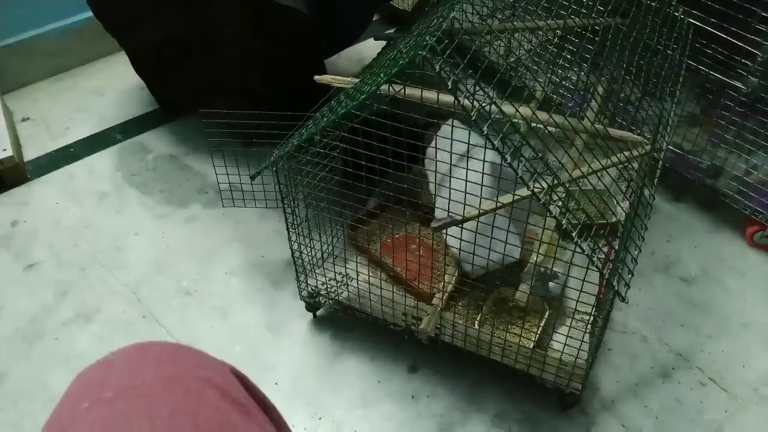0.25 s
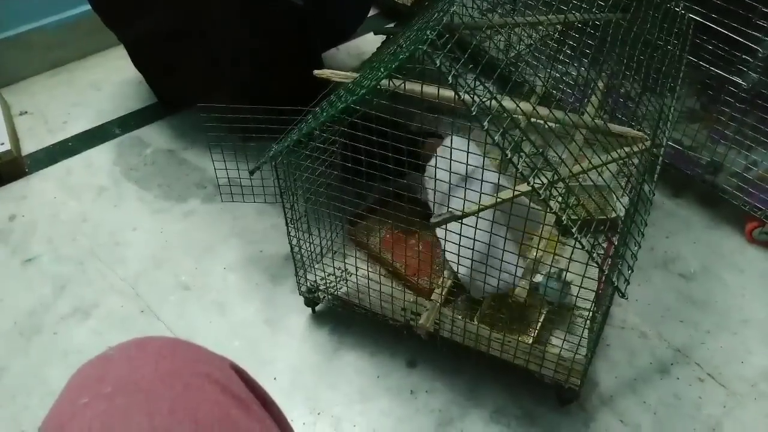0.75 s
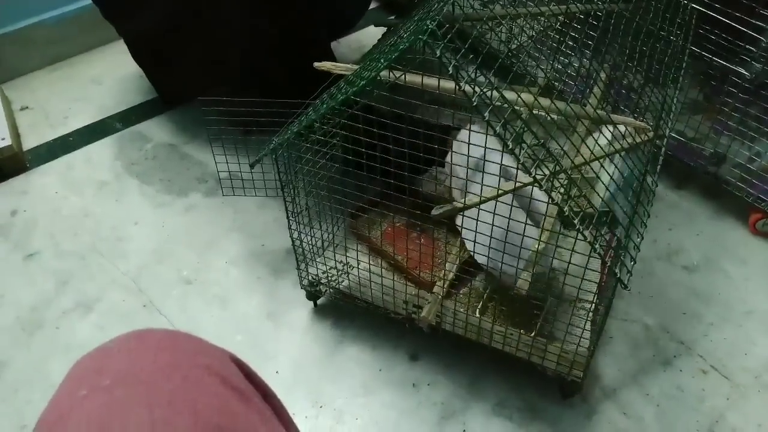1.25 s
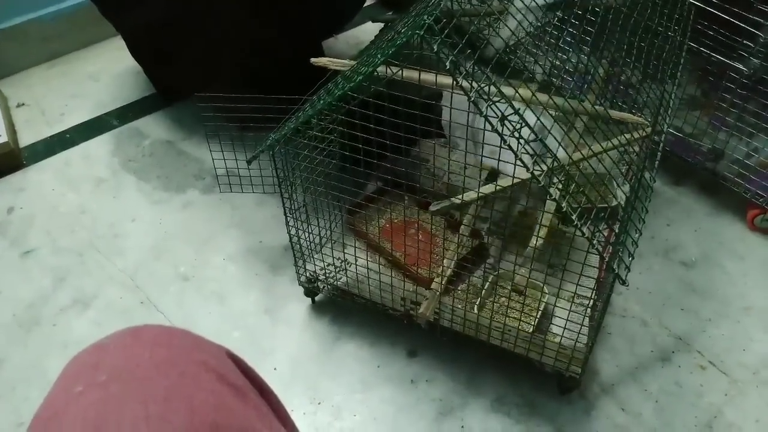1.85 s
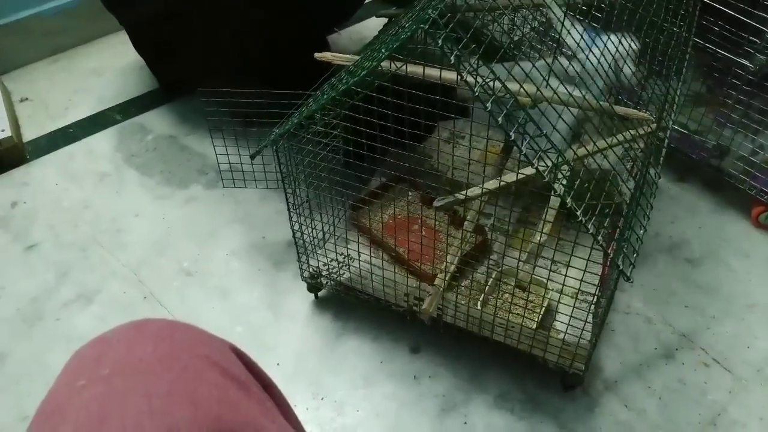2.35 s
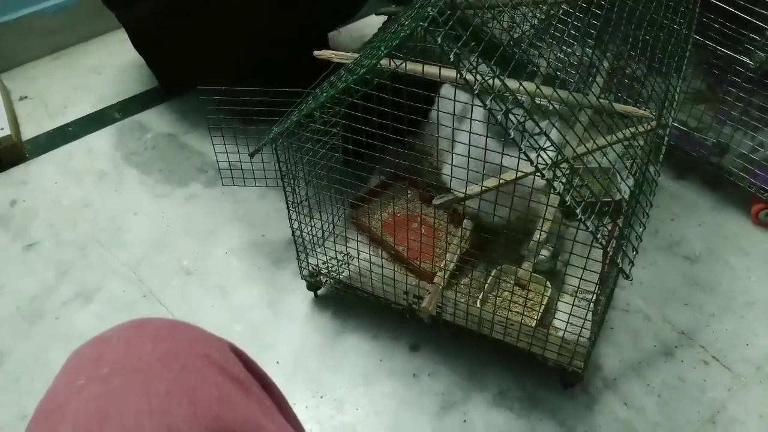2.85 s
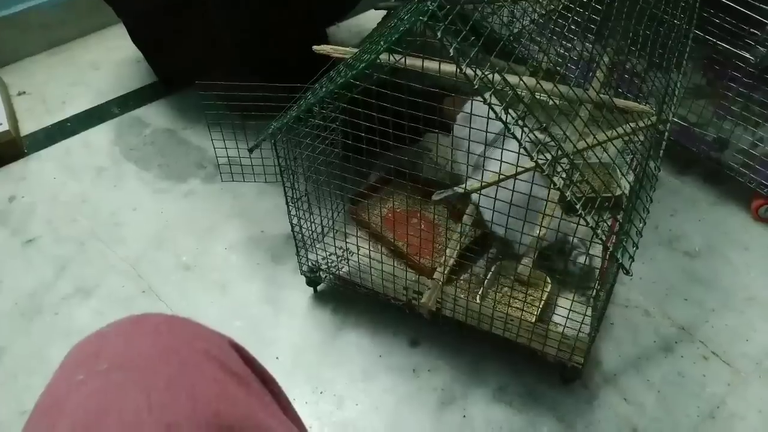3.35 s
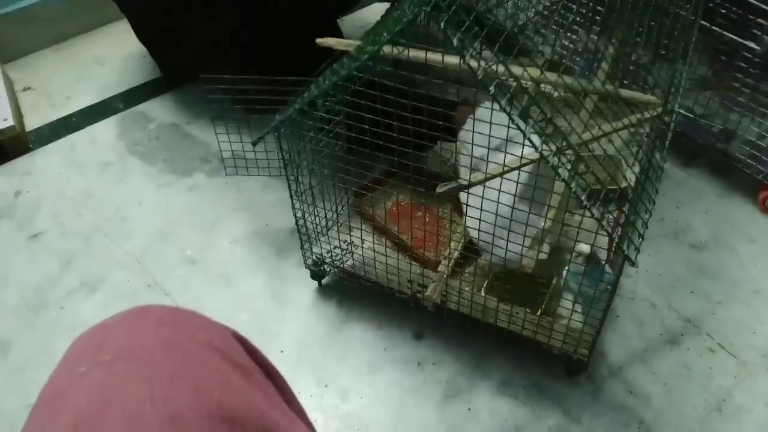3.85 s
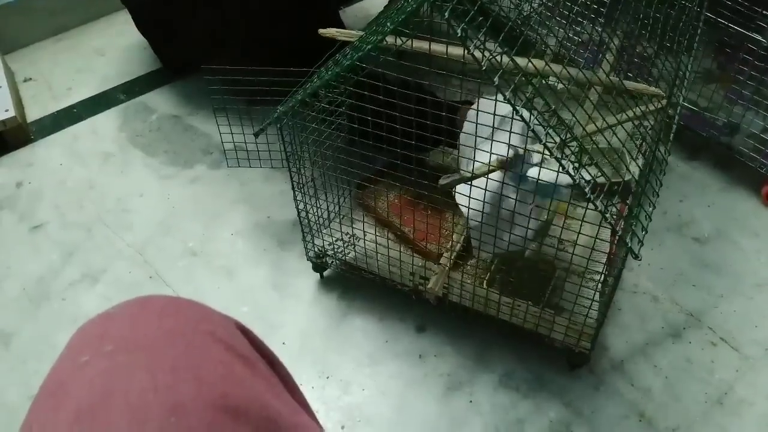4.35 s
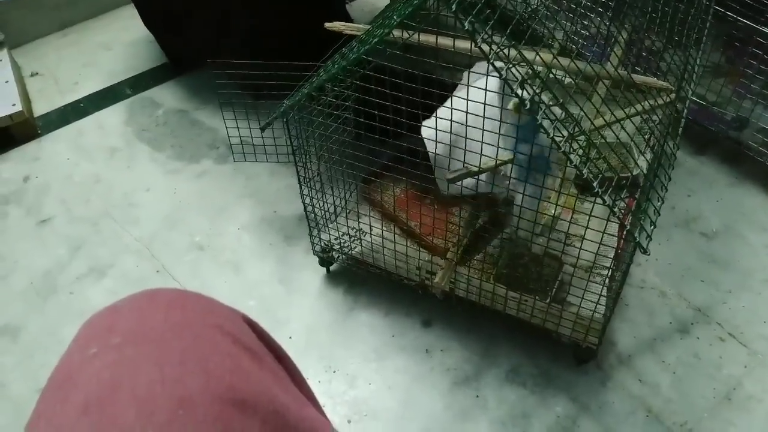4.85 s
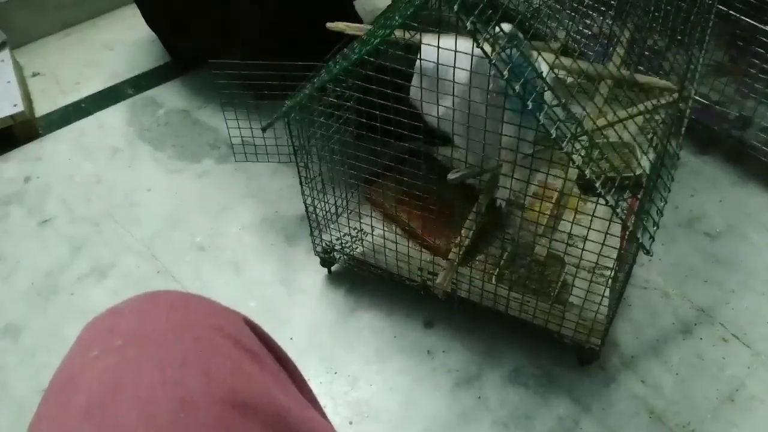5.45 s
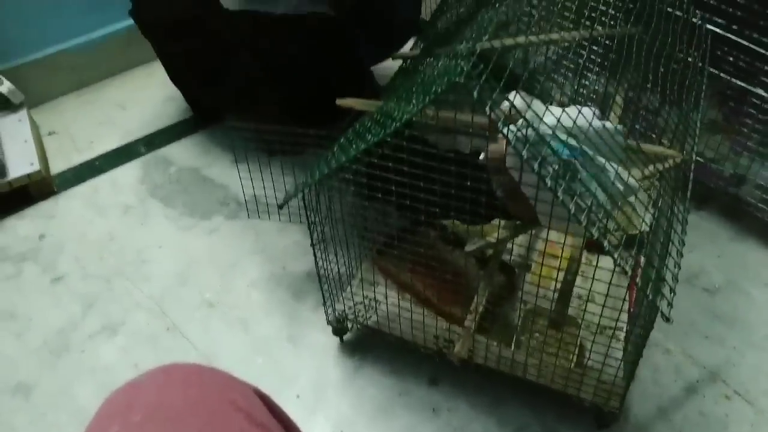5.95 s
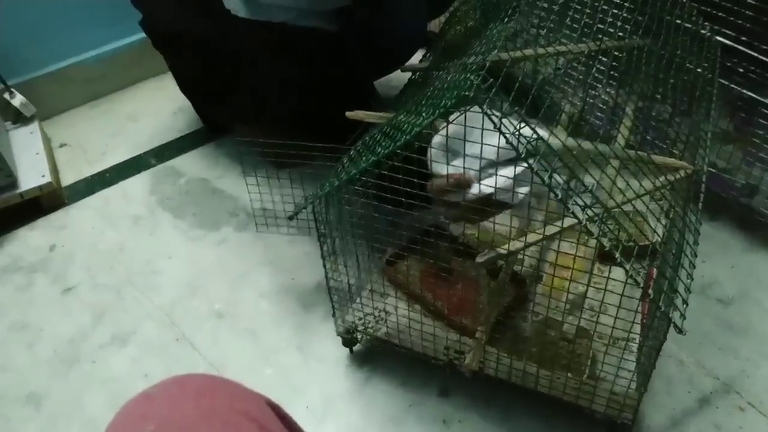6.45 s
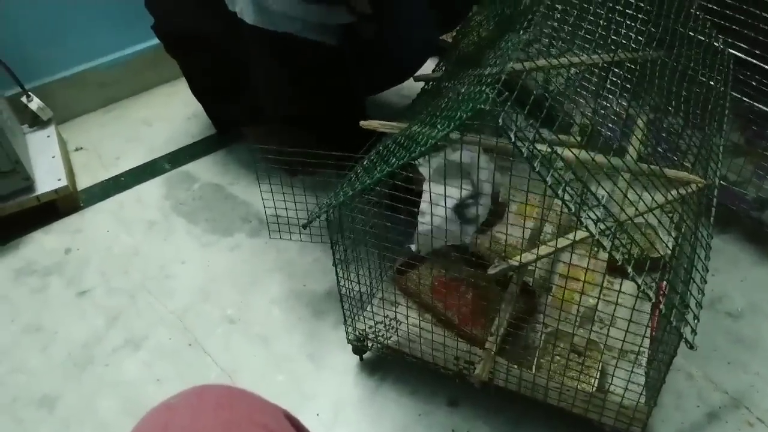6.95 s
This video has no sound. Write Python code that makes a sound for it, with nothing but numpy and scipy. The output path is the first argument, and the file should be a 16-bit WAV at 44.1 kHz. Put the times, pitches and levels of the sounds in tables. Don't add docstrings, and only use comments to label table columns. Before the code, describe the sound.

Small caged birds flutter in bursts, wings hissing and claws ticking on wire, with a parakeet's screeches and warbles and buzzy finch calls in a tiled room.

```python
import sys
import numpy as np
from scipy import signal
from scipy.fft import rfft, irfft, next_fast_len
from scipy.io import wavfile
from scipy.ndimage import uniform_filter1d, minimum_filter1d

SR = 44100
rng = np.random.default_rng(int(sys.argv[2]) if len(sys.argv) > 2 else 0)


def inscribe(sig):
    pcm = np.round(np.clip(np.atleast_2d(sig).T, -1, 1) * 32767)
    wavfile.write(sys.argv[1], SR, pcm.astype(np.int16))


def gain_from_decibels(decibels):
    exponent = np.asarray(decibels, float) / 20
    return 10 ** exponent


N = 317079
PORT_LAG_S = 0.0001756


def rms_one(x):
    return x / np.sqrt(np.mean(x ** 2) + 1e-20)


def at_hz(points, hz):
    table_hz, value = np.transpose(points)
    return np.interp(np.log(np.maximum(hz, 1)), np.log(table_hz), value)


def add(track, s, sound):
    i = round(s * SR)
    track[i:i + len(sound)] += sound[:N - i]


def drift(rate_hz, size):
    pole = np.exp(-3 * np.pi * rate_hz / SR)
    white = rng.standard_normal(size + 500)
    return rms_one(signal.lfilter([1], np.poly([pole] * 3), white)[500:])


def patches(shape, band_size, frame_size):
    coarse = rng.standard_normal((shape[0] // band_size + 1, shape[1] + frame_size))
    smooth = uniform_filter1d(coarse, frame_size, axis=1) * np.sqrt(frame_size)
    return np.repeat(smooth, band_size, axis=0)[:shape[0], :shape[1]]


def coloured(spectrum, grain_db=0, patchy_db=0, size=8):
    raw = rng.standard_normal(N)
    if patchy_db:
        frames = signal.stft(raw, nperseg=1024)[2]
        patch_gain = gain_from_decibels(patchy_db * patches(frames.shape, band_size=size, frame_size=2))
        raw = signal.istft(frames * patch_gain)[1][:N]
    if grain_db:
        raw = raw * gain_from_decibels(grain_db * drift(404, size=N))
    padded = next_fast_len(N)
    hz = np.fft.rfftfreq(padded, 1 / SR)
    inside = (hz >= spectrum[0][0]) & (hz <= spectrum[-1][0])
    return rms_one(irfft(rfft(raw, padded) * gain_from_decibels(at_hz(spectrum, hz)) * inside)[:N])


# (time [s], peak [dB], body [dB], fall [s])
FLAPS = [(0.0855, -18.5, -14.5, 0.01555), (0.194, -32.5, -7.5, 0.0328), (0.39, -38, -4, 0.0036),
         (0.438, -47.5, -14, 0.042), (0.582, -39.5, -27, 0.0071), (0.922, -26.5, -21, 0.017),
         (1.215, -37.5, -7, 0.027), (1.362, -25, -45.5, 0.017), (1.415, -23.5, -15, 0.0096),
         (1.4504, -13.5, -7, 0.0093), (1.5531, -15, -8, 0.0089), (1.6726, -19, -41.5, 0.0081),
         (2.07, -32.5, -15, 0.02), (2.366, -31, -11, 0.0451), (2.577, -26.5, -11, 0.0063),
         (2.8988, -36.5, -5, 0.038), (3.212, -33.5, -4.5, 0.0176), (3.4245, -26, -18, 0.00565),
         (3.499, -33, -14.5, 0.0055), (3.58, -32.5, -8, 0.018), (4.054, -25, -18, 0.00916),
         (4.2179, -28, -8.5, 0.0063), (4.344, -36, -10, 0.016), (4.95, -49, -33, 0.018),
         (5.0502, -45.5, -12, 0.0169), (5.437, -44, -27.5, 0.0033), (6.074, -39, -5.5, 0.01297),
         (1.9, -43.5, -13, 0.056), (2.63, -30.5, -10, 0.015), (2.72, -31, -4, 0.008),
         (2.78, -39.5, 2.5, 0.0098), (2.82, -33.5, 1, 0.027), (4.14, -30.5, -8, 0.0067),
         (4.181, -37.5, -24, 0.016), (6.37, -49, -15.5, 0.022), (6.845, -32.5, -11.5, 0.0124),
         (0.95, -35, -22, 0.01), (4.09, -38, -3.5, 0.0176), (4.55, -50.5, -11.5, 0.015)]
# (time [s], peak [dB], quill rasp [dB], body [dB], fall [s])
RAKES = [(0.829, -48, 20.5, 5, 0.0224), (0.8865, -37, 11.5, -5, 0.0197), (2.2427, -41, 19, -7.5, 0.033),
         (2.688, -25, 3, -1.5, 0.0093), (2.744, -22, 5.5, -6, 0.014), (3.05, -44, 25, 14, 0.00757),
         (3.3253, -41.5, 12.5, 5.5, 0.0084), (3.792, -37.5, 5, -4, 0.016), (3.932, -38, 8, -18.5, 0.0143),
         (5.274, -48, 16.5, -4.5, 0.0494), (5.5852, -32.5, 7.5, -3.5, 0.0117),
         (5.6565, -21.5, 9, -3, 0.0607), (5.739, -16, -1.5, -1.5, 0.0168)]
# (height [s], build-up [s], rustle [dB], thump [dB], draught on the ports [dB])
BOUTS = [(0.0, .1, -30, -59, -59.5), (.36, 0.34, -53.5, -77, -72.5), (.98, 0.39, -85, -54, -66.5),
         (1.3, 0.137, -46.5, -71, -75), (1.56, 0.239, -32.5, -37, -33), (1.68, 0.31, -54.5, -58, -43.5),
         (2.3, 0.32, -53.5, -69.5, -75), (2.457, 0.171, -75, -47, -52),
         (2.699, 0.1785, -33.5, -50.5, -47.5), (3.1, 0.74, -51.5, -64.5, -72), (3.5, 1.47, -54, -63.5, -69),
         (3.68, 0.58, -65.5, -52.5, -54.5), (3.98, 0.98, -51, -60, -75), (4.102, 0.25, -43, -48.5, -53.5),
         (4.2, 0.212, -52, -48.5, -69), (5.552, 2.05, -88.5, -77.5, -65.5), (5.708, 0.1473, -34, -35, -82),
         (5.789, 0.149, -57, -36.5, -38.5), (7.09, 0.66, -72, -59, -73.5), (7.19, 0.21, -48, -50, -79)]
# (rustle, thump, draught) [dB], [dB/s]
REST_DB = [-100, -70, -65]
CALM_DB_PER_S = [76.5, 101.5, 132]
# (frequency [Hz], level [dB/Hz])
FEATHER = [(2710, -33), (4600, -7), (7910, 1.5), (10100, 2), (12900, -2.5), (14900, 0), (16000, -13)]
QUILL = [(760, -8.5), (1300, -9.5), (1730, -4.5), (4210, -4.5), (4800, -11.5), (6240, -41), (10600, -120)]
BODY = [(280, -37.5), (470, -21), (529, -12), (1400, -12.5), (1820, -37.5), (3080, -120)]
THUMP = [(82, -40.5), (140, -16.5), (184, -7), (220, -4), (330, -6), (365, -14.5), (426, -9), (500, -21),
         (650, -47.5), (1100, -120)]
DRAUGHT = [(15, -60.5), (25, -30), (68, -3), (113, 0.5), (150, -6.5), (200, -36.5), (330, -120)]


def stirring():
    build_db = 31
    now = np.arange(N) / SR
    stir_db = np.array(REST_DB)[:, None] * np.ones(N)
    for at, build_s, *height_db in BOUTS:
        climb = build_db * np.maximum(at - now, 0) / max(build_s, .02)
        calm = np.outer(CALM_DB_PER_S, np.maximum(now - at, 0))
        stir_db = np.maximum(stir_db, np.array(height_db)[:, None] - climb - calm)
    return gain_from_decibels(2 * stir_db)


def wings():
    hiss, thump, draught = stirring()
    rasp = hiss * gain_from_decibels(2 * -4.0)
    body = thump * gain_from_decibels(2 * -9.0)
    t = np.arange(SR // 3) / SR
    flap_rasp_db = 2
    strokes = RAKES + [(at, db, flap_rasp_db, body_db, fall) for at, db, body_db, fall in FLAPS]
    for at, db, rasp_db, body_db, fall in strokes:
        fall = max(fall, .004)
        swell = (1 - np.exp(-t / (1.1 * fall))) ** 2 * np.exp(-t / fall)
        power = (swell / swell.max()) ** 2
        add(hiss, at, power * gain_from_decibels(2 * (db - 7.0)))
        add(rasp, at, power * gain_from_decibels(2 * (db + rasp_db - 15.5)))
        add(body, at, power * gain_from_decibels(2 * (db + body_db - 11.0)))
    feathers = []
    for port in (0, 1):
        soft = np.sqrt(hiss) * coloured(FEATHER, grain_db=-0.5, patchy_db=4.0, size=16)
        harsh = np.sqrt(rasp) * coloured(QUILL, grain_db=5.0, patchy_db=6.5, size=6)
        feathers.append(soft + harsh)
    low = np.sqrt(body) * coloured(BODY, grain_db=2.5, patchy_db=1.5, size=3)
    low += np.sqrt(thump) * coloured(THUMP, patchy_db=2.5, size=2)
    opposed = 0.244 * coloured(DRAUGHT) * np.array([[1], [-1]])
    buffet = np.sqrt(draught) * (coloured(DRAUGHT, patchy_db=5.0, size=2) + opposed)
    return feathers[0] + low, 0.042 * feathers[0] + 0.729 * feathers[1] + low, buffet


# (time [s], peak [dB], main ring [Hz], t60 [s])
TICKS = [(0.437, -32, 8790, 0.0214), (0.835, -31, 2150, 0.021), (2.581, -34.5, 2600, 0.0118),
         (4.149, -25.5, 2240, 0.0152), (4.227, -25, 2010, 0.0143), (4.37, -30, 5100, 0.0107),
         (0.8888, -16.5, 2932, 0.0147), (1.455, -13.5, 3140, 0.0335), (1.5592, -24, 2580, 0.0117),
         (1.6832, -4.5, 2393, 0.00485), (2.14, -27, 1454, 0.017), (2.579, -30.5, 7620, 0.015),
         (2.6913, -13, 8260, 0.0101), (2.7518, -12.5, 2910, 0.0098), (2.9, -22, 9790, 0.0276),
         (3.0602, -19.5, 4014, 0.011), (4.0648, -28.5, 4970, 0.0265), (4.102, -36, 4150, 0.0069),
         (5.091, -45, 862, 0.0123), (5.745, -5, 7750, 0.0219)]


def bars():
    others = 12
    out, t = np.zeros(N), np.arange(SR // 10) / SR
    for at, db, hz, t60 in TICKS:
        other_hz = np.exp(rng.uniform(np.log(1600), np.log(12000), others))
        wires_hz = np.append(hz, other_hz)[:, None]
        strength = gain_from_decibels(np.append(-4.0, rng.normal(-13, 3, others)))[:, None]
        ring = (strength * np.sin(2 * np.pi * wires_hz * t)).sum(0)
        ring *= gain_from_decibels(-60 * t / np.clip(t60, .003, .05))
        crack = 0.13 * np.diff(rng.standard_normal(len(t) + 1)) * np.exp(-t / 0.00083)
        add(out, at, gain_from_decibels(db - 3) * (ring + crack) * (1 - np.exp(-t / .001)))
    return out


def voice(rows, count, overtone_db, flutter_hz, waver, spread, fade_s, smear_rise=.55):
    s, hz, db, rough = np.transpose(rows)
    t = np.arange(s[0], s[-1], 1 / SR)
    hz, db, rough = (np.interp(t, s, column) for column in (hz, db, rough))
    rough = np.clip(rough, 0, 1)
    wavering_hz = hz * (1 + waver * rough * drift(flutter_hz, size=len(t)))
    phase = 2 * np.pi * np.cumsum(wavering_hz) / SR
    chop = drift(flutter_hz, size=len(t))
    tone, power = 0, 0
    for k in range(1, count + 1):
        gain = gain_from_decibels(overtone_db(k, hz)) * (k * hz < 15600)
        smear = drift(flutter_hz * k ** smear_rise, size=len(t))
        hoarse = rough ** (k ** -spread)
        breath = np.sqrt(1 - hoarse ** 2) + hoarse * (.7 * chop + .7 * smear)
        tone = tone + gain * breath * np.sin(k * phase + k * k)
        power = power + gain ** 2 / 2
    fade = np.clip(np.minimum(t - s[0], s[-1] - t) / fade_s, 0, 1)
    return s[0], fade * gain_from_decibels(db) * tone, np.sqrt(power)


def arch(size, swell):
    u, swell = np.linspace(0, 1, size), np.clip(swell, .05, .95)
    before = np.clip(1 - u / swell, 0, 1) ** 2
    after = np.clip((u - swell) / (1 - swell), 0, 1) ** 2
    return u, before, after


def note(s, length, first_hz, last_hz, db, swell):
    edge_db, rough = 6.5, 0.439
    u, before, after = arch(size=8, swell=swell)
    glide_hz = first_hz * (last_hz / first_hz) ** u
    return np.transpose([s + length * u, glide_hz, db - edge_db * (before + after), rough + 0 * u])


# (time [s], pitch [Hz], level [dB], roughness [0-1])
SCREECH = [
    [(0, 1938, -19, 0.7), (.02, 2019, -25, 0.6), (.032, 2290, -21.5, .7), (.045, 2391, -22, 0.4),
     (.065, 2468, -23.5, .7), (.088, 2443, -27, 0.88), (.11, 2300, -24, 1), (.125, 2100, -28.5, .9),
     (.145, 2008, -48.5, 1)],
    [(1.385, 2708, -18.5, 0.6), (1.4, 3075, -24.5, 0.6), (1.42, 3281, -15.5, 1.3), (1.445, 2967, -21, 0.8),
     (1.47, 3254, -13.5, 1.2), (1.5, 2921, -23, 1.13), (1.52, 2789, -27.5, 1.2), (1.55, 2550, -50.5, 1.1)],
    [(1.462, 2514, -28.5, 0.27), (1.474, 2490, -20.5, 0.8), (1.51, 2537, -26.5, 0.2),
     (1.535, 2358, -53, 1.1)],
    [(6.846, 1378, -49, 0.7), (6.87, 1512, -43, 0.9), (6.895, 1649, -29.5, 0.6), (6.92, 1831, -28, 0.35),
     (6.952, 1902, -27, 0.35), (6.98, 1782, -30, 0.35), (7.028, 1714, -29.5, 0.4), (7.085, 1865, -33, 0.3),
     (7.15, 1846, -49.5, 0.3)],
    [(6.665, 1250, -57.5, 1), (6.69, 1452, -53, 0.9), (6.72, 1296, -51, 1.1), (6.75, 1148, -50, 1.1),
     (6.785, 1190, -59.5, 0.9)],
]
SECOND_DB = [-5.5, 1, -3, 2.5, -19]
UPPER_DB = [-31, -35.5, -38, -17, -23]
BREATH_DB = [4, 4, 1, -4, 0]
# (rate [Hz], depth [0-1])
THROB = [(95, .4), (110, .25), (110, .2), (68, .35), (40, .6)]
# (time [s], length [s], first pitch [Hz], last pitch [Hz], level [dB])
WARBLE = [(1.13, 0.02, 4537, 3250, -49), (1.144, .018, 3254, 3050, -38), (1.156, .03, 2963, 1450, -34.5),
          (1.183, 0.042, 2861, 3271, -38), (1.221, .02, 3347, 3722, -40), (1.228, .016, 3056, 2075, -34),
          (1.243, 0.021, 1990, 2419, -35), (1.267, 0.044, 2494, 2064, -28.5),
          (1.296, .035, 2230, 1444, -29.5), (2.07, 0.04, 5000, 3084, -35.5),
          (2.097, 0.021, 3325, 1958, -31.5), (2.114, 0.023, 1972, 2440, -32.5),
          (2.145, 0.013, 2768, 3503, -31), (2.156, 0.044, 3580, 3422, -36),
          (2.163, 0.033, 2974, 1771, -32.5), (2.181, 0.024, 1870, 2040, -34.5),
          (2.219, .024, 2168, 2386, -28.5), (2.239, 0.027, 2318, 1633, -31.5),
          (2.242, 0.0081, 4066, 4520, -31), (6.232, 0.032, 5400, 3300, -41),
          (6.249, 0.022, 3346, 3098, -37.5), (6.26, .034, 2900, 1492, -33.5),
          (6.297, 0.032, 2961, 3300, -33.5), (6.325, 0.013, 3580, 3724, -36),
          (6.334, 0.0075, 3103, 2025, -27), (6.347, 0.029, 1980, 2232, -37.5),
          (6.372, 0.046, 2411, 1948, -29.5), (6.4, .042, 2106, 1453, -28)]
CHIRPS = [
    (0.832, 0.0102, 1092, 1090, -52),
    (1.359, 0.022, 3220, 4830, -25.5),
    (1.378, 0.012, 3832, 3380, -21),
    (0.088, 0.041, 4500, 3740, -33.5),
    (0.496, 0.16, 3515, 3030, -64),
    (6.572, 0.0534, 1362, 1150, -57.5),
]
# (pitch [Hz], level [dB])
THROAT = [(1050, 14), (1510, 5), (1700, -6), (2050, -3.5), (2400, -33), (5000, -21)]
WHISTLE = [(1400, -10), (2000, -22), (2600, -24.5), (3300, -15.5), (4200, -3.5), (5400, -1)]


def parakeet():
    out = np.zeros(N)
    whistle_air_db, steady = 4.5, (0, 0)
    calls = [(call, THROAT, *rest) for call, *rest in zip(SCREECH, SECOND_DB, UPPER_DB, BREATH_DB, THROB)]
    for row in CHIRPS:
        second_db = min(0, 2 * at_hz(THROAT, row[2]) - 36)
        calls.append((note(*row, swell=.14), THROAT, second_db, -30.0, whistle_air_db, steady))
    for row in WARBLE:
        calls.append((note(*row, swell=.42), WHISTLE, 0, -29.5, whistle_air_db, steady))
    beak = signal.butter(2, 990, "high", fs=SR, output="sos")
    for call, throat, second_db, upper_db, air_db, (throb_hz, depth) in calls:
        def partial_db(k, hz):
            if k == 1:
                return 0
            return second_db + at_hz(throat, hz) if k == 2 else upper_db - 1.2 * (k - 3)

        at, tone, _ = voice(call, count=9, overtone_db=partial_db, flutter_hz=135, waver=.024,
                            spread=1.1, fade_s=.003, smear_rise=.95)
        beat = 2 * np.pi * np.cumsum(throb_hz * (1 + .2 * drift(30, size=len(tone)))) / SR
        tone = tone * (1 + np.clip(depth, 0, 1) * np.cos(beat))
        breath = signal.sosfilt(beak, rng.standard_normal(len(tone))) * np.abs(signal.hilbert(tone))
        add(out, at, 1.533 * (tone + gain_from_decibels(upper_db + air_db) * breath))
    return out


# (time [s], length [s], pitch [Hz], glide [octaves], level [dB])
FINCH = [(1.876, 0.216, 536.3, -0.0155, -41), (2.229, 0.21, 610.1, -0.5, -40.5),
         (2.932, 0.1304, 620.8, -0.308, -43.5), (3.372, 0.087, 483, 0.117, -47),
         (3.803, 0.1028, 486.4, 0.081, -50.5), (4.724, 0.1116, 557.1, 0.156, -55.5),
         (5.285, 0.1488, 494.1, 0.03, -53.5), (6.627, 0.153, 555.8, -0.034, -58),
         (7.115, 0.089, 486.4, 0.041, -47.5), (2.635, 0.1038, 498.6, 0.058, -45.5),
         (4.14, 0.0665, 604.5, -0.02, -51.5)]
# (share of it spent swelling [0-1], beak opening [factor], tilt [dB/octave])
MANNER = [(.45, 0.969, 0.5), (0.1211, 0.941, 15.5), (0.46, 1, -4), (0.4306, 0.854, 0.5),
          (0.3496, 0.933, -0.5), (0.331, 0.915, -4), (0.4695, 0.956, -0.5), (0.1766, 0.926, -6.5),
          (0.14, 0.959, -1.5), (0.38, 0.996, -3.5), (0.442, 0.94, 3)]
FINCH_ROUGH = [.1, .6, .2, .22, .2, .45, .25, .8, .3, .3, .2]
# (frequency [Hz], level [dB])
BEAK = [(290, -69), (500, -26), (684, -47.5), (1090, -19.5), (1900, -20.5), (2110, -16), (2630, -5.5),
        (2950, -10), (3200, 1.5), (3470, -8), (4330, -4), (5330, -14.5), (8000, -35.5), (10400, -72.5),
        (17600, -120)]


def finches():
    swell_db, die_db, arch_oct = 11.5, 9.5, 0.13
    out = np.zeros(N)
    for (s, length, hz, glide, db), (swell, gape, tilt_db), rough in zip(FINCH, MANNER, FINCH_ROUGH):
        u, before, after = arch(size=12, swell=swell)
        pitch = hz * 2 ** (glide * (u - .5) - arch_oct * (before + .5 * after))
        level_db = db - swell_db * before - die_db * after ** 1.16
        call = np.transpose([s + length * u, pitch, level_db, rough + 0 * u])

        def beak_db(k, hz):
            return at_hz(BEAK, k * hz / gape) + tilt_db * np.log2(k * hz / 3300)

        at, tone, loudness = voice(call, count=20, overtone_db=beak_db, flutter_hz=97.2, waver=0.0082,
                                   spread=0.425, fade_s=.022)
        add(out, at, gain_from_decibels(11.0) * tone / loudness)
    return out


# (time [s], length [s], pitch [Hz], level [dB])
PEEP = (3.5, 0.0572, 2147.5, -27.5)


def peep():
    lag_s, echo_s, echo_db = .00009, 0.038, -17
    at, length, hz, db = PEEP
    out, t = np.zeros((2, N)), np.arange(0, length, 1 / SR)
    shape = np.clip(t / 0.0033, 0, 1) * np.sqrt(1 - t / length)
    for port in (0, 1):
        phase = 2 * np.pi * hz * (t - port * lag_s)
        tone = shape * (np.sin(phase) + gain_from_decibels(-22.5) * np.sin(2 * phase))
        add(out[port], at, gain_from_decibels(db) * tone)
        add(out[port], at + echo_s, gain_from_decibels(db + echo_db) * tone)
    return out


# (time [s], peak [dB], mode [Hz], length [s])
BOOMS = [(0.93, -41, 103.2, 0.0218), (1.441, -33, 296, 0.0116), (3.689, -46, 111.8, 0.036),
         (5.688, -22.5, 429, 0.036), (5.76, -35, 127.3, 0.0626), (6.488, -50, 101.3, 0.0136),
         (2.06, -52, 175, 0.05), (2.63, -44, 219, 0.0437), (3.8, -51, 202, 0.0394),
         (4.42, -54.5, 207.9, 0.0615), (5.27, -55, 152.6, 0.082), (6.1, -53, 179.2, 0.0484)]


def tray():
    out = np.zeros(N)
    for at, db, hz, length in BOOMS:
        t = np.arange(0, length, 1 / SR)
        add(out, at, gain_from_decibels(db) * np.sin(np.pi * t / length) ** 2 * np.sin(2 * np.pi * hz * t))
    return out


def scattered(x, direct):
    scatter_s = .005
    t = np.arange(int(6 * scatter_s * SR)) / SR
    cluster = rng.standard_normal((2, len(t))) * np.exp(-t / scatter_s) * np.clip(t / .001, 0, 1)
    cluster *= np.sqrt((1 - direct) / np.sum(cluster ** 2, axis=1, keepdims=True))
    cluster[[0, 1], [0, round(PORT_LAG_S * SR)]] += np.sqrt(direct)
    return signal.fftconvolve(x[None], cluster, axes=1)[:, :N]


def widen(mid, side):
    side = signal.lfilter(*signal.butter(1, 1000, "high", fs=SR), side)
    return np.array([mid + side, mid - side])


# (frequency [Hz], t60 [s])
ROOM_T60 = [(100, 0.474), (1000, 0.305), (3000, 0.2397), (8000, 0.2143), (16000, 0.048)]


def room(x):
    t = np.arange(int(.7 * SR)) / SR
    echoes = 0
    for hz in 52.78 * 2 ** np.arange(8):
        octave = signal.butter(2, [hz, 2 * hz], "band", fs=SR, output="sos")
        noise = signal.sosfilt(octave, rng.standard_normal((2, len(t))))
        echoes = echoes + noise * gain_from_decibels(-60 * t / at_hz(ROOM_T60, np.sqrt(2) * hz))
    echoes = widen(*echoes * np.clip((t - .003) / 0.00419, 0, 1))
    echoes = echoes / np.sqrt(np.sum(echoes ** 2) / 2)
    return signal.fftconvolve(x[None], echoes, axes=1)[:, :N]


# (frequency [Hz], level [dB/Hz])
HUSH = [(15, -47.5), (25, 2.5), (108, -9.5), (170, -33.5), (263, -2.5), (373, -2), (1100, -12), (2410, -12),
        (4250, -15), (5730, -17.5), (9070, -14), (14800, -17.5), (16000, -17.5)]


def hush():
    return gain_from_decibels(-55.5 - 7.5) * widen(coloured(HUSH, patchy_db=4.5), coloured(HUSH))


# (time [s], left minus right [dB])
PARAKEET_PAN = [(0, 0.5), (1.3, 1), (2.3, 1), (6.3, -2.5), (6.9, -4.5)]


def scene():
    near, far, buffet = wings()
    struck = bars() + tray()
    buzzes, whistles = finches(), parakeet()
    later = np.interp(np.arange(N) - PORT_LAG_S * SR, np.arange(N), struck + far)
    wet = room(struck + 0.6296 * near + 0.515 * buzzes + 0.5755 * whistles)
    pan_db = np.interp(np.arange(N) / SR, *np.transpose(PARAKEET_PAN))
    perch = gain_from_decibels(np.outer([.5, -.5], pan_db))
    voices = scattered(buzzes, direct=.55) + perch * scattered(whistles, direct=.35) + peep()
    return np.array([struck + near, gain_from_decibels(1.21) * later]) + voices + wet + buffet + hush()


def roll_off(x):
    return signal.sosfilt(signal.butter(12, 15790, fs=SR, output="sos"), x)


def record(dry):
    rounded = .75 * np.tanh(dry / .75)
    dry = signal.sosfilt(signal.butter(3, 44, "high", fs=SR, output="sos"), rounded)
    hz, _, frames = signal.stft(dry, SR, nperseg=1024)
    power = np.mean(np.abs(frames) ** 2, axis=0)
    level_db = 10 * np.log10(uniform_filter1d(power, size=7, axis=0) + 1e-20)
    level_db = uniform_filter1d(level_db, size=4, axis=1)
    masked_db = -minimum_filter1d(-level_db, size=60, axis=0) - level_db
    hz = hz[:, None]
    keen = np.interp(hz, [3000, 7000], [.045, .3])
    weak = .4 * np.exp(-(np.log2(hz / 5600 + 1e-9) / .3) ** 2)
    chance = patches(level_db.shape, band_size=4, frame_size=8)
    spared = (chance + masked_db * keen + weak > 2.7) & (hz > 2200)
    mix = signal.istft(frames * np.where(spared, .03, 1), SR)[1][:, :N]
    return roll_off(mix)


dry = scene()
out = record(dry)
inscribe(out)
```